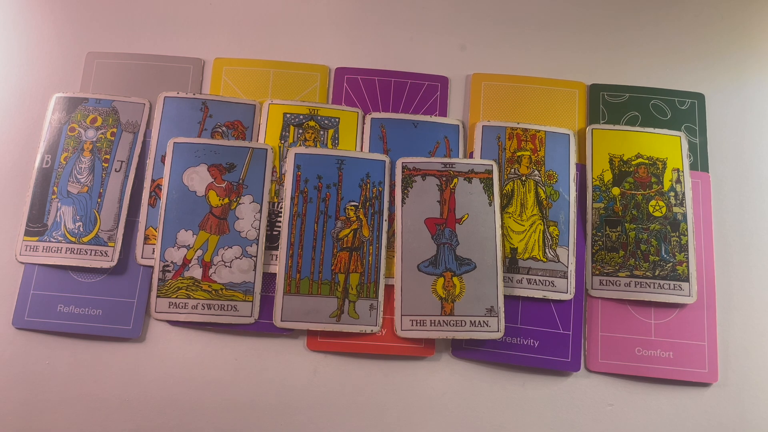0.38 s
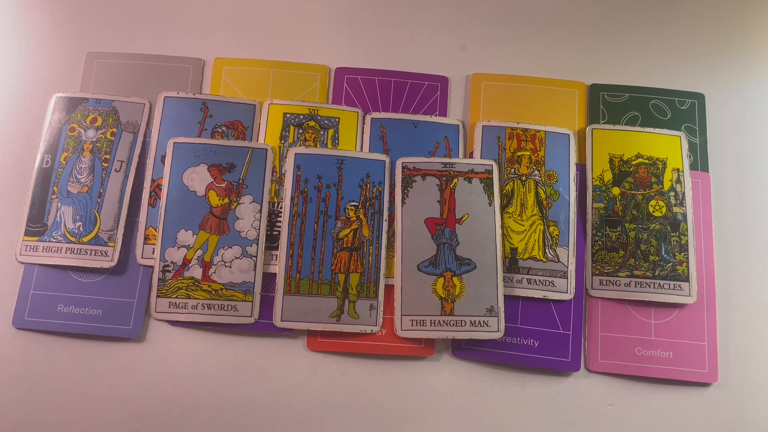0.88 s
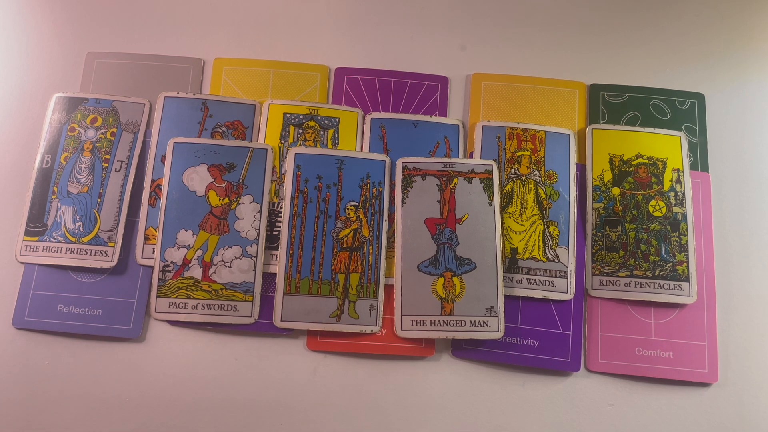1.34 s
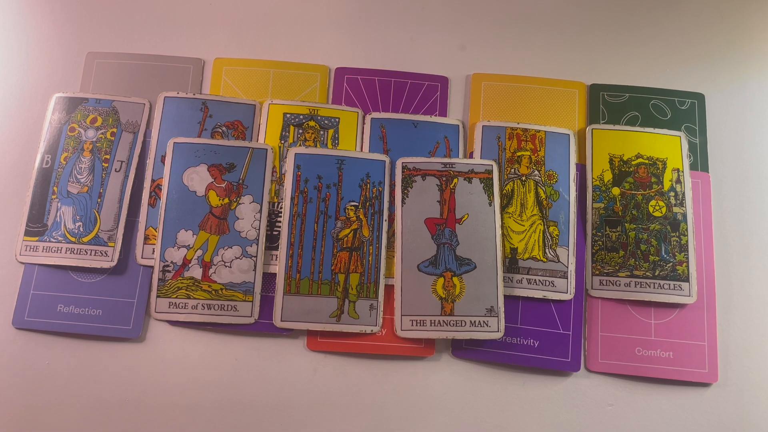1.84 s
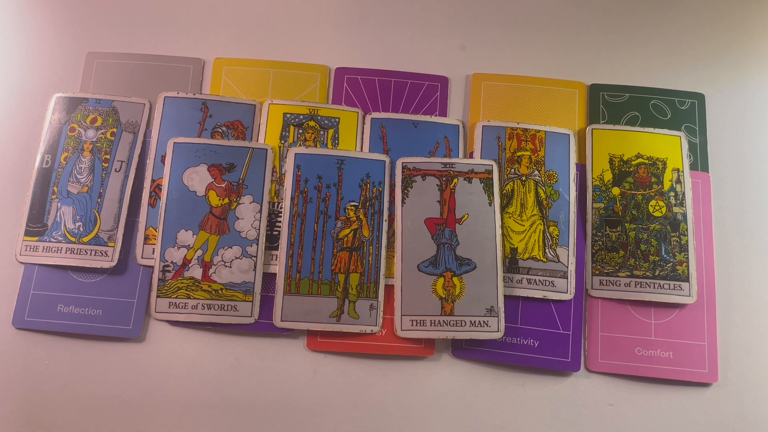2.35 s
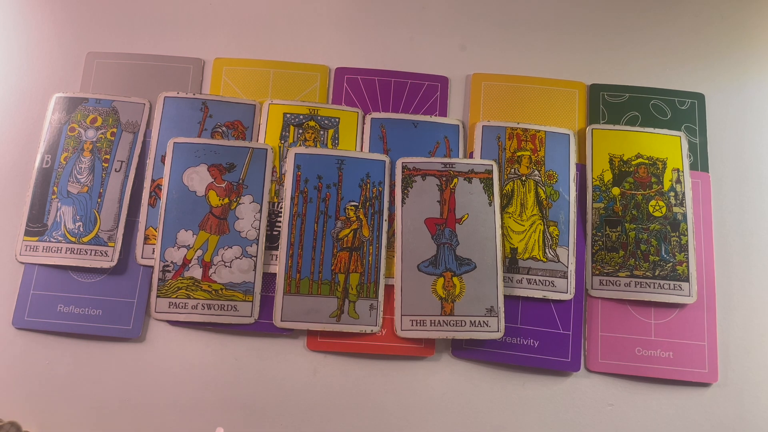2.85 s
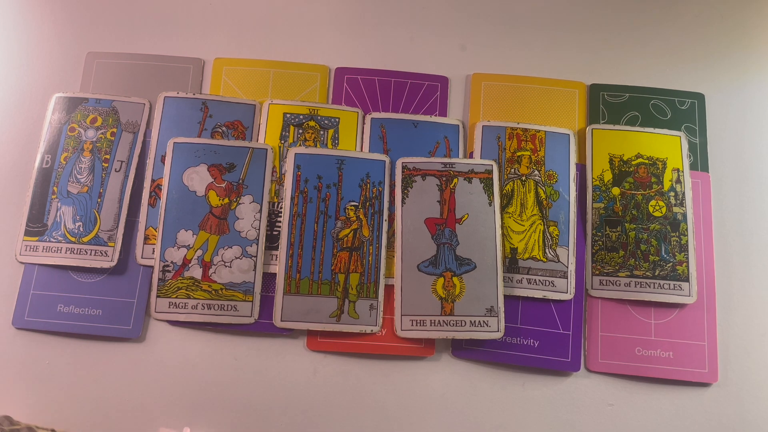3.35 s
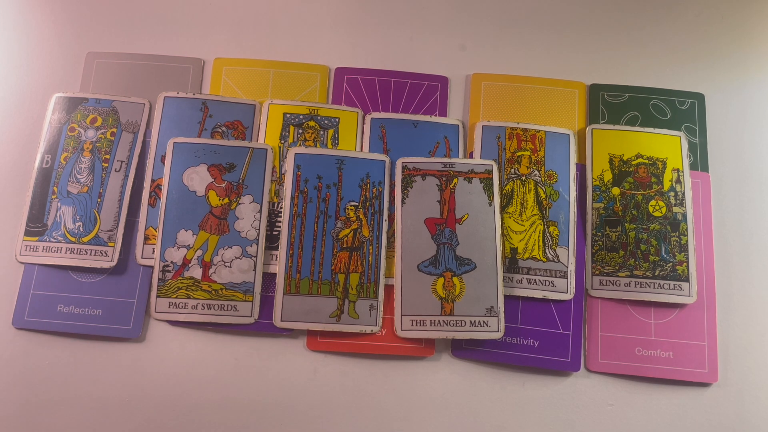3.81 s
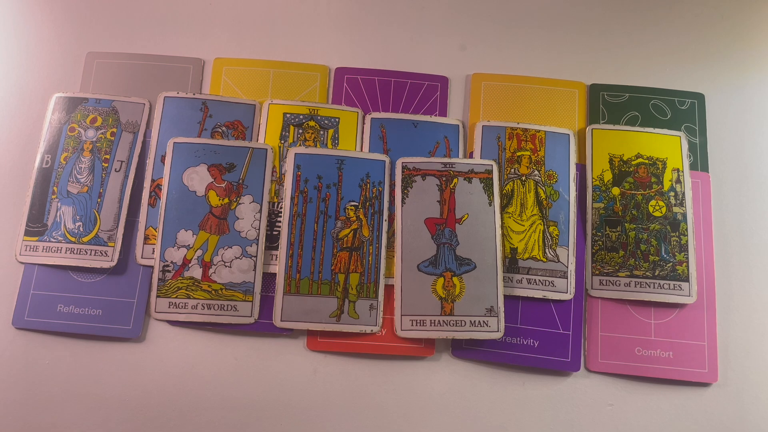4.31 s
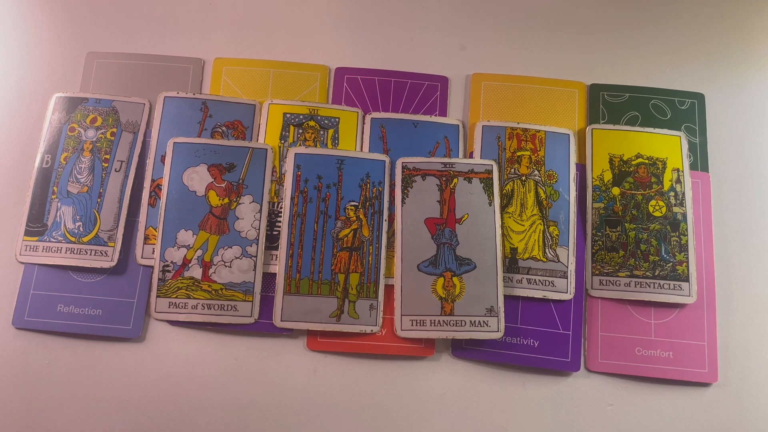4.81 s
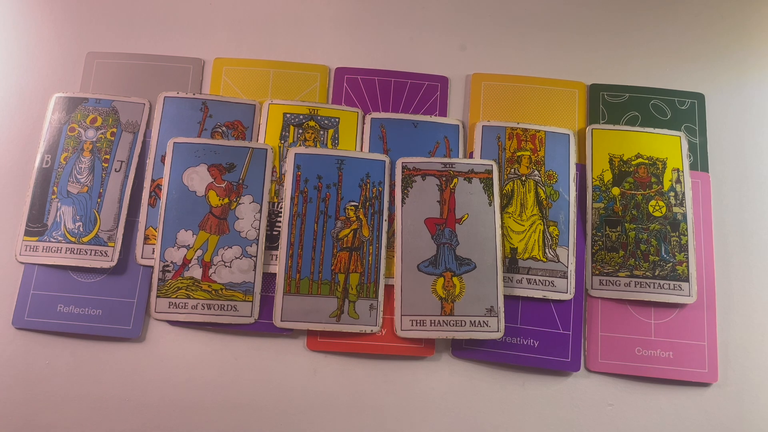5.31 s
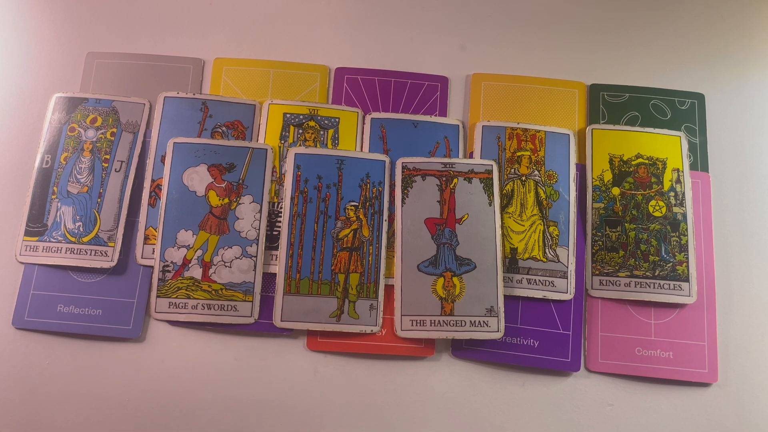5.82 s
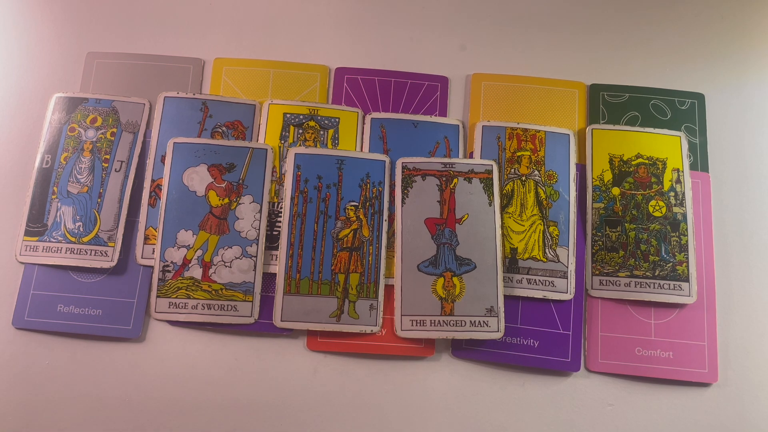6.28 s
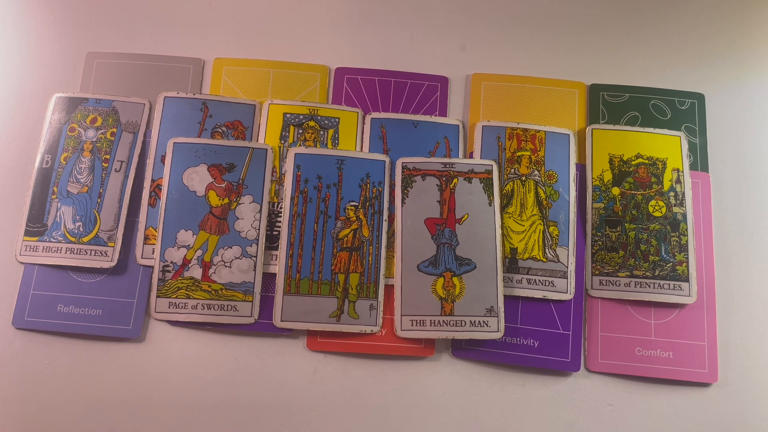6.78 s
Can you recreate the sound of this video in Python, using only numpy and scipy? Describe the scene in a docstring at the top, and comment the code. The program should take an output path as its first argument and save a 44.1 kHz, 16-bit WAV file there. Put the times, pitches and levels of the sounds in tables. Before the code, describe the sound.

Close-up card shuffling in a small room: sparse snaps, a hollow thump, a dense riffle, squaring knocks and lighter flicks above a steady appliance hum.

```python
"""Hands shuffle a deck of stiff cards over a wooden table in a small room, close to a two-port microphone. Bent
cards flick free with a short ring, snap and sizzle; faces slide past each other as jittery noise. The deck is
knocked on the table top: struck modes ring, loose cards clatter and air cracks out. Underneath, an appliance
hums in wavering sine lines and the handling rumbles low in swells of noise."""
import sys
import numpy as np
from scipy import signal
from scipy.fft import rfft, irfft
from scipy.io import wavfile
from scipy.ndimage import uniform_filter1d

SR = 44100
rng = np.random.default_rng(int(sys.argv[2]) if len(sys.argv) > 2 else 0)


def to_linear_factor(level_db):
    """Convert decibel levels (scalar or array-like) to linear amplitude factors."""
    exponent = np.asarray(level_db, float) / 20
    return 10 ** exponent


def unload_wav(signal):
    """Save mono or channel-first audio to the path in sys.argv[1] as 16-bit WAV at rate SR, clipped to [-1, 1]."""
    wavfile.write(
        sys.argv[1],
        SR,
        np.round(np.clip(np.atleast_2d(signal).T, -1, 1) * 32767).astype(np.int16),
    )


N = 315756  # samples
HZ = np.fft.rfftfreq(N, 1 / SR)
TIME = np.arange(N) / SR


def on_log(table):
    """Reads a (frequency [Hz], value) table at every frequency, on a log axis."""
    hz, value = np.transpose(table)
    return np.interp(np.log(HZ + 1), np.log(hz + 1), value)


def unit(x):
    """Scales to rms 1."""
    return x / np.sqrt(np.mean(x ** 2))


def noise(table):
    """Noise of rms 1 with the colour of a (frequency [Hz], relative level [dB]) table."""
    spectrum = rfft(rng.standard_normal(N))
    return unit(irfft(spectrum * to_linear_factor(on_log(table)), N))


def band(lo_hz, hi_hz):
    """Noise of rms 1 between two edges."""
    sos = signal.butter(2, [lo_hz, hi_hz], "band", fs=SR, output="sos")
    return unit(signal.sosfilt(sos, rng.standard_normal(N)))


def walk(rate):
    """Random levels, rate per second, held and smoothed twice; spread about 1."""
    hold = int(SR / rate)
    steps = np.repeat(rng.standard_normal(N // hold + 1), hold)
    return unit(uniform_filter1d(uniform_filter1d(steps, hold), hold)[:N])


def add(out, s, sound):
    """Mixes a sound in from time s."""
    i = int(s * SR)
    out[i:i + len(sound)] += sound[:N - i]


def swell(t, rise_s, t60):
    """Builds while the contact lasts, then dies away by 60 dB in t60 seconds."""
    rise = np.sin(np.pi / 2 * np.minimum(t / max(rise_s, 1 / SR), 1)) ** 2
    return rise * to_linear_factor(-60 * np.maximum(t - rise_s, 0) / t60)


# lines of the appliance under the take: (frequency [Hz], middle level [dB rms])
HUM_LINES = [(59.2, -52), (118.4, -57), (166.9, -57.5), (209.9, -45.5), (247.6, -54), (296.1, -52.5)]


def hum():
    """Steady sine lines, each wavering on its own in level and phase."""
    out = np.zeros(N)
    for hz, db in HUM_LINES:
        level = np.sqrt(2) * to_linear_factor(db + 1.57 * walk(8.3))
        out += level * np.sin(2 * np.pi * hz * TIME + 0.56 * walk(5.4))
    return out


# the low handling rumble swells up: (time of the peak [s], deep level [dB], upper level [dB])
RUMBLE_SWELLS = [(0.02, -41, -72), (.58, -45, -50.5), (1.35, -52, -66), (2.65, -33, -72), (3.17, -81, -47),
                 (3.63, -70, -50)]


def rumble():
    """Two low noise bands: a wandering floor plus bell-shaped swells."""
    deep_db, upper_db, wander_db = -59, -55, 2.5  # floors and their spread
    swell_s = 0.083  # standard deviation of the bell
    s, deep_swell_db, upper_swell_db = np.transpose(RUMBLE_SWELLS)[:, :, None]
    hump = np.exp(-.5 * ((TIME - s) / swell_s) ** 2)
    deep = to_linear_factor(deep_db + wander_db * walk(2.88)) + np.sum(to_linear_factor(deep_swell_db) * hump, axis=0)
    upper = to_linear_factor(upper_db + wander_db * walk(3.07)) + np.sum(to_linear_factor(upper_swell_db) * hump, axis=0)
    deep_noise = noise([(15, -34.0), (30, -16), (42, 35.5), (52, -0.5), (70, -33.5)])
    upper_noise = noise([(40, -34.0), (55, 4.5), (120, 2.5), (220, -6.0), (400, -45.0)])
    return deep * deep_noise + upper * upper_noise


# colour of the small room at rest: (frequency [Hz], relative level [dB per Hz])
ROOM_TONE_COLOUR = [(12, -28), (20, -38), (59, -4), (150, -3.5), (209, -7.5), (228, -3), (346, -10.5),
                    (427, -11.5), (549, -21), (623, -19.5), (927, -29.5), (1010, -28), (1740, -39),
                    (2430, -43), (3000, -57), (3900, -74), (6600, -120)]


def room_tone():
    """Steady coloured noise, unrelated on three paths."""
    level_db = -46.5  # rms
    return to_linear_factor(level_db) * np.array([noise(ROOM_TONE_COLOUR) for path in range(3)])


def turning_tail(x, tail, rate):
    """Convolves with two reflection patterns of mean energy 1 and keeps shifting between them."""
    pair = signal.fftconvolve(x[None], tail / np.sqrt(np.sum(tail ** 2) / 2), axes=1)[:, :N]
    turn = 3 * walk(rate)  # radians
    return pair[0] * np.cos(turn) + pair[1] * np.sin(turn)


def room(x, t60=0.41, wet_db=-15.0):
    """A dense tail, duller as it fades; the moving hands keep shifting it between two sets of reflections."""
    t = TIME[:SR // 2]
    low = signal.lfilter([.1], [1, -.88], rng.standard_normal((2, len(t)))) * to_linear_factor(-60 * t / t60)
    high = 0.21 * rng.standard_normal((2, len(t))) * to_linear_factor(-60 * t / 0.4)
    tail = (low + high) * np.minimum(t / 0.008, 1)
    return x + to_linear_factor(wet_db) * turning_tail(x, tail, 220)


def near_reflections(hits):
    """Hands and cards near the ports reflect the hits in a brief smear, shifting as they move."""
    t = TIME[:SR // 8]
    smear = rng.standard_normal((2, len(t))) * to_linear_factor(-60 * t / 0.03)
    return to_linear_factor(-7) * turning_tail(hits, smear, 25)


# deck meets table, drive of each layer:
# (time [s], thump level [dB], deck level [dB], edge level [dB], crack level [dB])
TABLE_KNOCKS = [(1.328, -21, -30, -31, -40.5), (1.334, -9.5, -42, -21.5, -27),
                (1.337, -13, -11.5, -50, -41), (1.35, 1, -12.5, -56, -32), (1.363, -19, -47, -42.5, -40),
                (1.397, -22, -38, -54, -51), (1.408, -21, -56, -61, -56), (1.459, -30, -54, -50, -53),
                (3.541, -26.5, -59, -24.5, -12.5), (3.663, -20, -25, -20.5, -25.5),
                (3.829, -17, -16, -25.5, -28), (3.9, -21, -27.5, -56, -50), (4.014, -25, -25.5, -33.5, -53),
                (4.058, -37, -24.5, -35, -61), (4.082, -41, -28, -26.5, -50), (4.094, -52, -36, -21.5, -30),
                (4.098, -17.5, -17.5, -23.5, -18), (4.109, -53, -27, -43, -51.5),
                (4.162, -37, -27, -18, -23), (4.183, -28, -21.5, -38, -37), (4.194, -19.5, -18, -33, -32),
                (4.211, -14.5, -17, -39, -30), (4.217, -11.5, -19.5, -34, -53), (4.232, -29, -37, -51, -49),
                (4.258, -19, -43, -37, -64), (4.417, -24.5, -28.5, -32, -60),
                (4.507, -32, -33, -47.5, -57.5), (4.55, -32, -39, -49, -56),
                (6.257, -14, -29, -46.5, -53.5), (6.268, -10, -42.5, -34, -56),
                (6.276, -13.5, -38, -49, -42), (6.321, -39, -24.5, -45, -56),
                (6.33, -18, -20.5, -26.5, -37), (6.336, -31, -47.5, -27, -51),
                (6.846, -25.5, -33, -27.5, -33), (6.893, -40, -60, -45, -42)]
# modes that table and deck ring with, by layer: (centre frequency [Hz], relative level [dB], t60 [s])
THUMP_MODES = [(206, -38, 0.0067), (238.7, -17, 0.19), (280.4, -9, 0.11), (299.4, -12, 0.043),
               (345, -15, 0.016)]
DECK_MODES = [(494, -8, 0.1), (550, -13.5, 0.02), (595, -5, 0.011), (738, -5.5, 0.086), (790, -7.5, 0.03)]
EDGE_MODES = [(1120, -8.5, 0.043), (1344, -15, 0.011), (1614, -6, 0.047), (2010, 1, 0.033),
              (2250, -5.5, 0.024), (2452, -12.5, 0.06), (2875, 0.5, 0.03), (3450, -17.5, 0.0067)]


def knocks():
    """Every blow rings the same modes, struck at another spot; loose cards clatter and a crack of air leaves."""
    contact_s = 0.00168
    spot_db = 1.5  # scatter of the modes from blow to blow
    out, low, high, crack = np.zeros((4, N))
    t = TIME[:SR // 3]
    for s, thump_db, deck_db, edge_db, crack_db in TABLE_KNOCKS:
        for modes, db in ((THUMP_MODES, thump_db), (DECK_MODES, deck_db), (EDGE_MODES, edge_db)):
            for hz, mode_db, t60 in modes:
                spot, detune = rng.standard_normal(2)
                # the top gives way first, so the pressure starts with a dip
                ring = -np.sin(2 * np.pi * hz * (1 + 0.012 * detune) * t)
                rise_s = max(contact_s, 1 / hz)  # low modes take a whole cycle to build
                add(out, s, to_linear_factor(db + mode_db + spot_db * spot) * swell(t, rise_s, t60) * ring)
        add(low, s, to_linear_factor(deck_db - 11) * swell(t, contact_s, 0.075))
        add(high, s, to_linear_factor(edge_db - 7.5) * swell(t, contact_s, 0.087))
        add(crack, s, to_linear_factor(crack_db) * swell(t, contact_s, 0.0096))
    # the small top moves no air in the deep bass
    out = signal.sosfilt(signal.butter(2, 150, "high", fs=SR, output="sos"), out)
    edge_colour = [(700, -37.5), (1100, 1.5), (2000, 3.5), (3200, -2), (4200, -15.5), (7000, -42)]
    clatter = low * band(330, 1100) + high * noise(edge_colour)
    return out + clatter + crack * band(2100, 4740)


# the deck works in the hands: (time [s], rub level [dB], dull level over it [dB])
DECK_HANDLING = [(0.0, -75, -4), (0.759, -63, 2), (1.3, -64, -7.5), (1.52, -67.5, 1.5), (2.12, -73, -6),
                 (2.25, -64.5, 2), (2.3, -61, 8.5), (3.05, -54, 5.5), (3.3, -51.5, -1), (3.8, -56.5, 2.5),
                 (4.08, -53, 11), (4.45, -54.5, 4), (4.62, -57.5, 1), (4.8, -68, -11), (5.12, -68, 3),
                 (5.2, -56, 1.5), (5.75, -63, -1), (6.05, -70, -12), (6.25, -61, 2), (6.5, -65, 6),
                 (6.66, -80, 9), (6.86, -58, -4), (7.059, -66, 8), (7.16, -68, 10)]
# single slides of card on card: (start [s], length [s], peak rub level [dB], dull level over it [dB])
CARD_SLIDES = [(0.005, 0.095, -58.5, -20), (0.255, 0.058, -60, -3), (0.296, 0.11, -55, 1.5),
               (0.402, 0.25, -72, 11.5), (0.61, 0.097, -55, -0.5), (0.683, 0.1, -42.5, -8),
               (1.586, 0.16, -66.5, 4), (1.861, 0.096, -63.5, 5), (1.926, 0.18, -71, 9.5),
               (2.03, 0.085, -72, 10), (2.428, 0.055, -60, 11), (2.51, .08, -54, 13),
               (3.077, 0.086, -48.5, 3), (3.131, 0.066, -40.5, 4), (3.172, 0.072, -48, 8),
               (3.35, 0.1, -54.5, -17), (3.55, 0.19, -53, -24), (4.813, 0.064, -75, -1),
               (4.855, 0.15, -61, -3), (5.28, 0.027, -61, -13), (5.585, 0.16, -48, -7),
               (5.79, 0.16, -63.5, -1), (6.094, 0.091, -57, -10), (6.527, 0.15, -59.5, 1.5),
               (7.087, 0.11, -53, -2.5)]


def rubbing():
    """How hard the faces rub, bright and dull part: handling, single slides and the skid after each flick."""
    peak_share = 0.44  # share of a slide spent growing
    # skid: rub level at 0 dB of sizzle, dB per dB of sizzle, dull part over it
    skid_db, skid_slope, skid_dull_db = -42, 0.91, 2
    s, rub_db, dull_db = np.transpose(DECK_HANDLING)
    bright = to_linear_factor(np.interp(TIME, s, rub_db))
    dull = to_linear_factor(np.interp(TIME, s, rub_db + dull_db))
    for s, length, db, dull_db in CARD_SLIDES:
        t = TIME[:int(length * SR)]
        angle = np.interp(t, [0, peak_share * length, length], [0, np.pi / 2, np.pi])
        hump = np.sin(angle) ** 2
        add(bright, s, to_linear_factor(db) * hump)
        add(dull, s, to_linear_factor(db + dull_db) * hump)
    for s, db, _, sizzle_db, _ in CARD_FLICKS:
        skid = to_linear_factor(skid_db + skid_slope * (db + sizzle_db)) * swell(TIME[:SR // 5], 0.0075, 0.1)
        add(bright, s, skid)
        add(dull, s, to_linear_factor(skid_dull_db) * skid)
    return bright, dull


# colours of face on face, bright and dull: (frequency [Hz], relative level [dB per Hz])
BRIGHT_RUB = [(1500, -20.5), (2500, -7), (4000, -3), (7000, -2.5), (9000, -1.5), (12000, -10.5),
              (13000, -16.5), (15600, -14.5)]
DULL_RUB = [(250, 12.5), (500, 9), (1000, -8.5), (1600, 1), (2500, -3), (4000, -47.5)]


def slide():
    """Faces rub in tiny slips: noise whose level jitters fast, with scattered grains; three unrelated paths."""
    bright, dull = rubbing()
    # about 350 grains a second, each dying by a factor e in 0.7 ms
    grains = (rng.random(N) < 350 / SR) * to_linear_factor(6.5 * np.minimum(rng.exponential(size=N), 3))
    slips = .35 * signal.lfilter([1], [1, -np.exp(-1 / (0.0007 * SR))], grains)
    grip = to_linear_factor(3.28 * walk(60)) * (0.83 + slips)
    return np.array([grip * (bright * noise(BRIGHT_RUB) + dull * noise(DULL_RUB)) for path in range(3)])


# a card edge lets go, drive of each part:
# (time [s], level [dB], body level over it [dB], sizzle level over it [dB], body frequency [Hz])
CARD_FLICKS = [(0.335, -37.5, -4, 13, 1460), (0.5505, -45.5, 8, 19, 754), (0.6784, -21, -8.5, 12.5, 2050),
               (0.7566, -18, -5, 3, 1440), (1.697, -53, -10, 22.5, 715), (1.8834, -29, -11, 1, 745),
               (1.9602, -39, -10, 6, 790), (2.0481, -41.5, 10, 18, 1880), (2.278, -25.5, -7, 12, 1560),
               (2.3037, -32, 10.5, 12, 1140), (2.3363, -20.5, -3, -9, 1790), (2.3429, -27.5, 7.5, -2, 820),
               (2.3524, -20, 1, 1, 920), (2.374, -27.5, -2, -18, 910), (2.4343, -24.5, 4.5, -7, 1670),
               (2.4548, -22.5, -7, 15, 756), (2.4802, -20, 5, 7.5, 1120), (2.4973, -36.5, 18.5, -17, 1610),
               (2.52, -24, -16, 6, 770), (2.5345, -19.5, -10, -8, 1250), (2.554, -24, 1, -4, 840),
               (2.56, -19, -14, 6, 2260), (2.567, -14.5, -4.5, 6, 1260), (2.6254, -26.5, 0, 15.5, 1700),
               (2.6803, -20.5, 0.5, 9, 850), (2.7218, -20, -3, 8.5, 1170), (2.7374, -31, 17.5, -14, 1170),
               (2.76, -20, 6.5, 8.5, 1040), (2.8043, -32.5, 18, 14, 1360), (2.832, -12.5, -7, 8, 740),
               (2.8866, -27.5, 10.5, 16, 1000), (2.915, -31, 2, 3, 1060), (2.9335, -25, 2.5, 14, 1080),
               (2.9589, -24.5, 4.5, 9, 1690), (2.9733, -30, -9, -19, 1610), (3.019, -21.5, -10, 9.5, 1670),
               (3.0378, -19.5, -2, 10, 760), (3.083, -26, 6, 13, 790), (3.0922, -17.5, -8, -1, 1930),
               (3.122, -20, -1.5, 0, 1910), (3.1527, -19, -5, -17, 2080), (3.187, -15, -1.5, -20, 2060),
               (3.1959, -20, 1.5, -3, 1370), (3.2373, -8, -8.5, 2, 1280), (3.2815, -12, -12, 11, 1000),
               (3.483, -11.5, -15, -0.5, 1014), (3.509, -34, 5, 20, 1440), (3.543, -25.5, 20, 16.5, 1280),
               (3.6545, -18, -20, 0, 2030), (3.804, -35, 0, 7, 726), (3.832, -23, -2, -2, 800),
               (4.163, -32, -10, 15, 2020), (4.6975, -36, -21, 27, 690), (5.2876, -49, -14, -2, 829),
               (5.325, -26, -12, 10, 1460), (5.393, -34, 10, 10, 664), (5.4299, -21.5, -7, 11, 2040),
               (5.5173, -24.5, -5.5, 13, 1510), (5.5476, -24, 0, 12, 2180), (5.6434, -21.5, -5, 2, 2120),
               (5.6615, -24, -3.5, -12, 2000), (5.687, -25, -11, -14, 1440), (5.849, -43, -25, 12, 710),
               (5.9278, -42, 5.5, 11.5, 1480), (6.848, -17.5, -3, 3, 2026), (6.9924, -40.5, 5.5, 17, 1220),
               (7.132, -47, 19, 21, 1940), (7.1384, -21, -3, 3, 2250)]


def flicks():
    """Short bursts: the bent card rings at its own pitch, with a snap and a sizzle on top."""
    fade_s, rise_s = 0.0013, 0.0022
    fade_t60 = np.log(1000) * fade_s  # a fall by a factor e takes fade_s
    tone, body, snap, sizzle = np.zeros((4, N))
    t = TIME[:SR // 5]
    for s, db, body_db, sizzle_db, body_hz in CARD_FLICKS:
        fade = swell(t, rise_s, fade_t60) * to_linear_factor(db - 12)
        ring = swell(t, 0.16 * fade_s, 1.8 * fade_t60) * np.sin(2 * np.pi * body_hz * t)
        add(tone, s, to_linear_factor(db + body_db - 8.5) * ring)
        add(body, s, to_linear_factor(body_db - 1.5) * fade)
        add(snap, s, fade)
        add(sizzle, s, to_linear_factor(db + sizzle_db - 11) * swell(t, 0.39 * fade_s, 0.26 * fade_t60))
    sizzle_colour = [(4000, -31), (5500, -10.5)] + BRIGHT_RUB[3:]
    return tone + body * band(670, 1840) + snap * band(1860, 6800) + sizzle * noise(sizzle_colour)


# phase of the left port ahead of the right: (frequency [Hz], lead [radians])
LEFT_PORT_LEAD = [(20, 0), (300, -.05), (1300, -.3), (2200, 0), (3200, 1.2), (4000, .45), (4800, .55),
                  (6200, 1.5), (9000, 2.8), (10000, 3.1), (14500, 3.2), (15600, 3.7), (16500, 3.2)]
# left port over the right: (frequency [Hz], level [dB])
LEFT_PORT_EXCESS = [(200, 0), (500, .5), (1300, .5), (2400, -2), (4400, 0)]
# gain of the share that differs between the ports: (frequency [Hz], level [dB])
SCATTERED_SHARE = [(40, -33), (100, -17.5), (250, -15), (400, -5), (560, -1.5), (800, 5), (1500, -2.5),
                   (3000, 0.5), (5000, -3.5), (8000, -6.5), (10000, -13), (13500, -15), (15500, -6)]


def scene():
    """Both ports hear one sound, shifted in phase against each other, and each its own scattered share."""
    hits = room(knocks() + flicks())
    spread = rfft(slide() + room_tone())
    # the near reflections are opposite at the two ports
    bounce = rfft(near_reflections(hits)) * np.array([[1], [-1]])
    scattered = (bounce + spread[1:]) * to_linear_factor(on_log(SCATTERED_SHARE))
    shared = rfft(hits + hum() + rumble()) + spread[0]
    # half of the lead and excess goes to each port
    port = to_linear_factor(on_log(LEFT_PORT_EXCESS) / 2) * np.exp(.5j * on_log(LEFT_PORT_LEAD))
    return irfft((shared + scattered) * np.array([port, 1 / port]), N)


def top_cut(x):
    """Nothing passes above the cut-off."""
    return signal.sosfilt(signal.butter(12, 16940, fs=SR, output="sos"), x)


def record(dry):
    """The top is cut off steeply above 15.8 kHz."""
    cut = signal.sosfilt(signal.ellip(8, .2, 60, 15800, fs=SR, output="sos"), dry)
    return top_cut(cut)


dry = scene()
out = record(dry)
unload_wav(out)
```